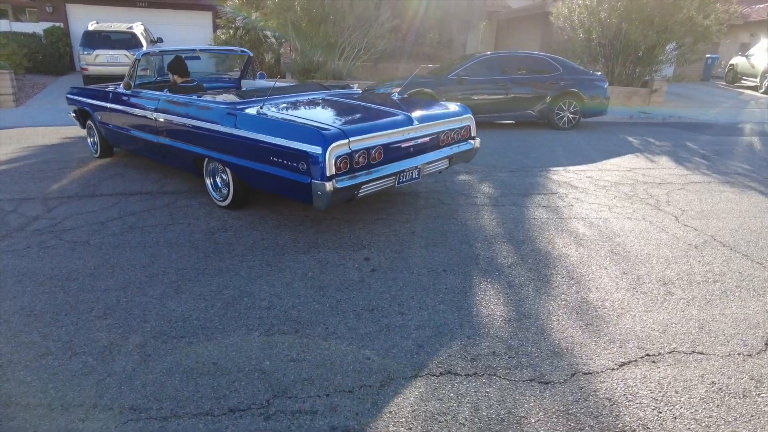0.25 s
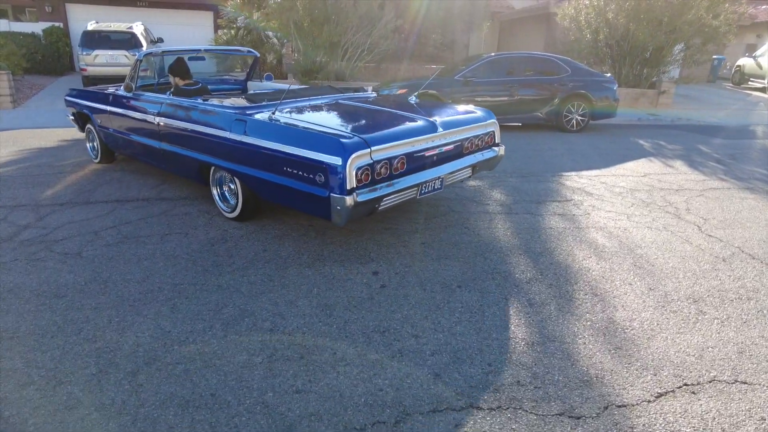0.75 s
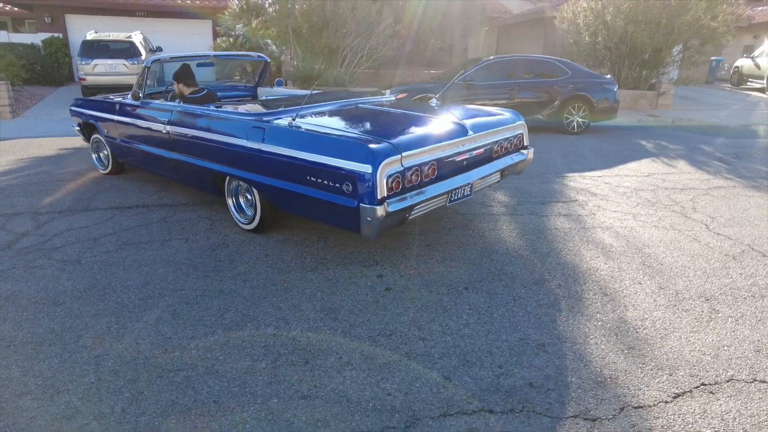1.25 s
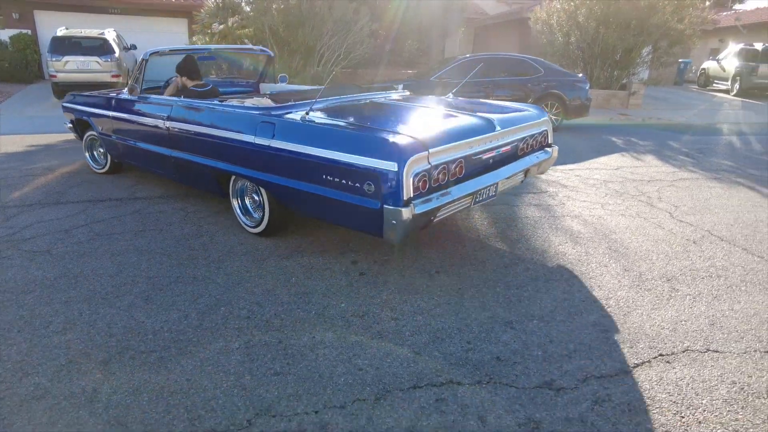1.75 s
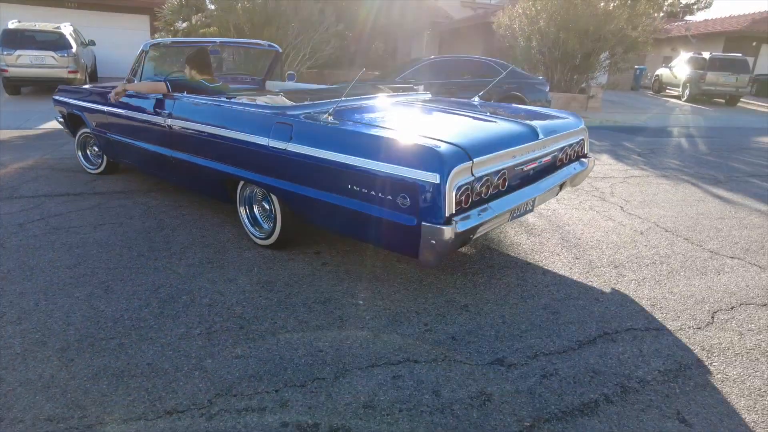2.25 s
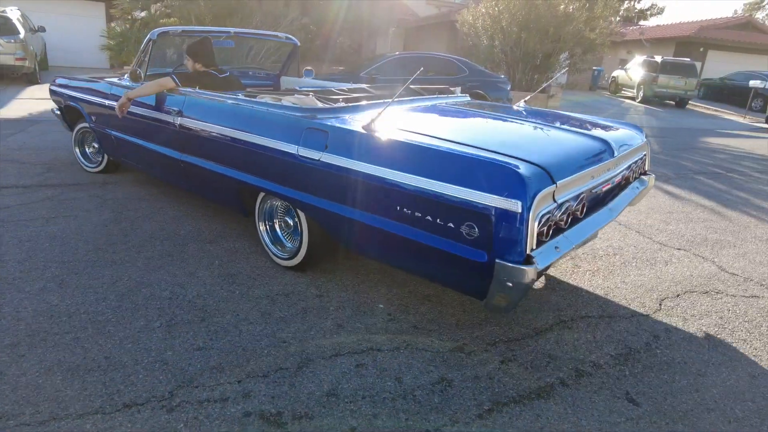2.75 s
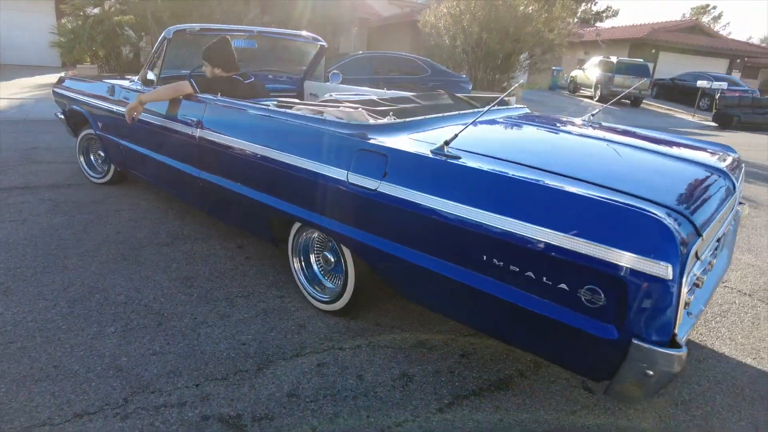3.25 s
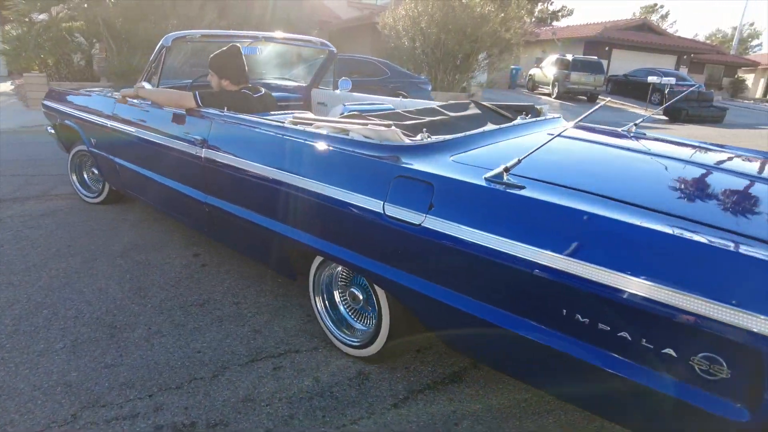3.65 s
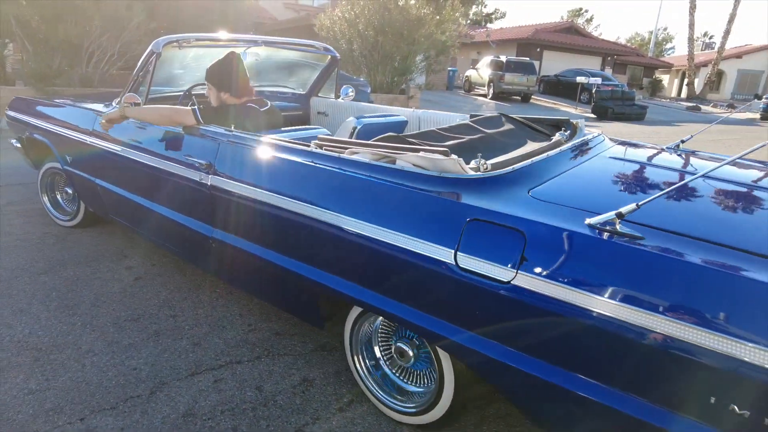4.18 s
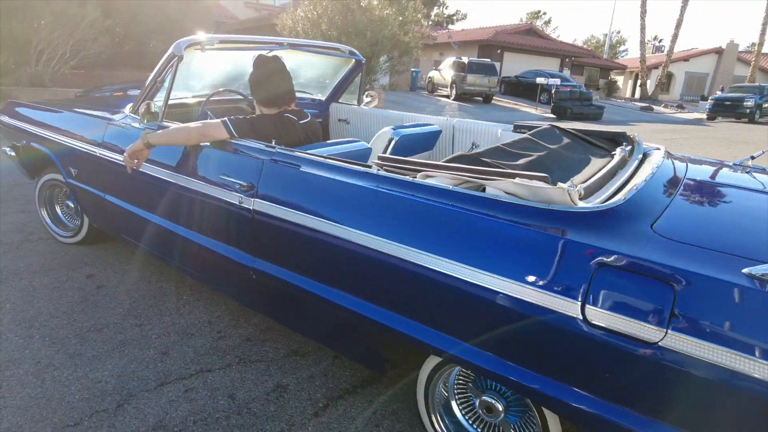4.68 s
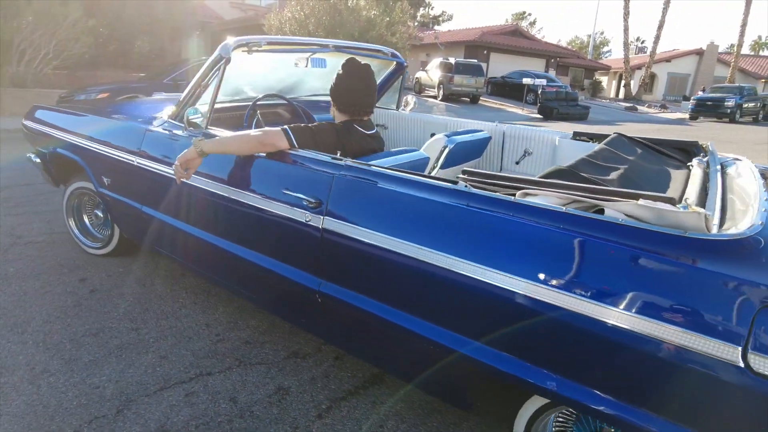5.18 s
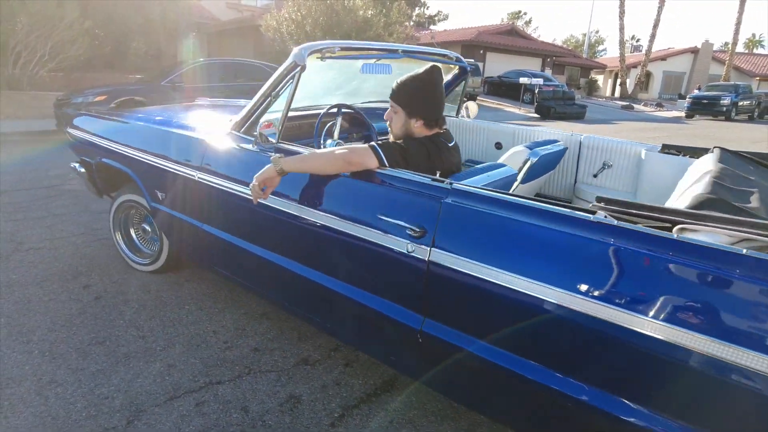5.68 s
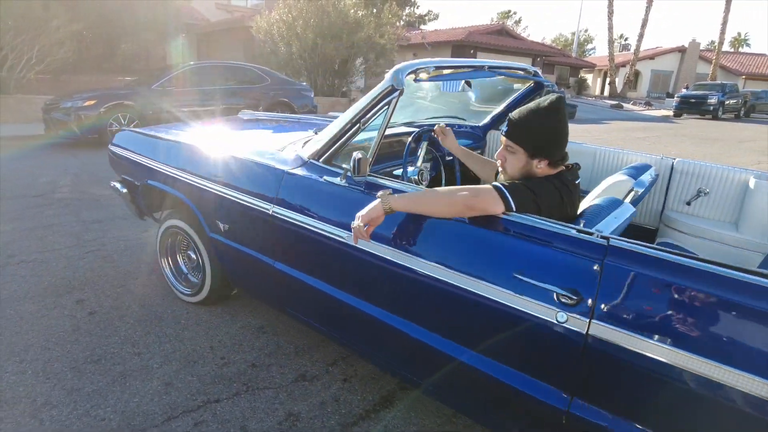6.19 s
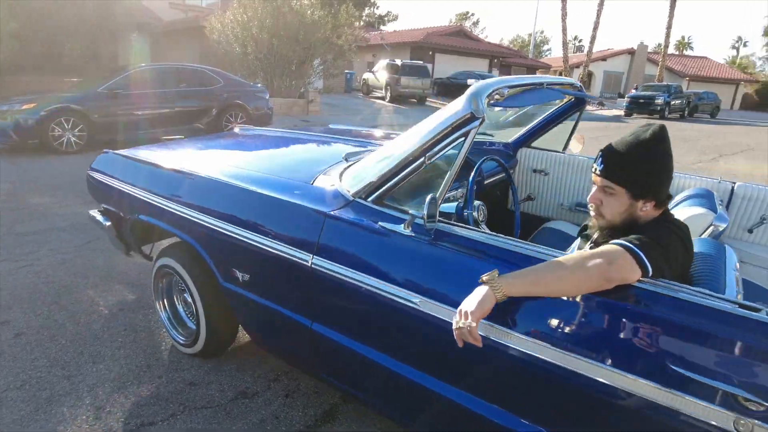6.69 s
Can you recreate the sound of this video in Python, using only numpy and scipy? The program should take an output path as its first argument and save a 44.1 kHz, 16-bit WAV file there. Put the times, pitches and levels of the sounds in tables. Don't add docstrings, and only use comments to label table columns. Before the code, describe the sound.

An old eight-cylinder convertible idles roughly on a residential street, heard in stereo by someone walking past. The exhaust hunts and stumbles, swells in one short soft rev with an airy intake hiss, then drops to a steady lopsided burble. The sound grows nearer, shifting from tail pipe toward bonnet, with more metallic clatter, fan hiss and a faint steering-pump groan. Small stones tick and crunch on the asphalt.

```python
import sys
import numpy as np
from scipy import signal
from scipy.fft import rfft, irfft, next_fast_len
from scipy.io import wavfile
from scipy.ndimage import uniform_filter1d

SR = 44100
rng = np.random.default_rng(int(sys.argv[2]) if len(sys.argv) > 2 else 0)


def how_loud(loudness_db):
    steps = np.asarray(loudness_db, float) / 20
    return 10 ** steps


def persist_wave(psi):
    counts = np.round(np.clip(psi, -1, 1) * 32767).astype(np.int16)
    wavfile.write(sys.argv[1], SR, np.atleast_2d(counts).T)


N = 305613

# t/s, speed/rpm
CRANK_SPEED = [(0.0, 718.9), (0.22, 587.2), (0.7, 615.2), (1.0, 788.9), (1.22, 795.7), (1.46, 944.8),
               (1.67, 957.9), (2.02, 616.2), (2.56, 696.9), (3.53, 691.3), (3.87, 636.0), (4.6, 670.9),
               (5.03, 657.6), (5.48, 698.7), (6.18, 624.8), (6.66, 688.0), (6.77, 677.5), (6.93, 694.3)]
# t/s, load (-1 coasting, 0 idle, 1 throttle pressed)
ENGINE_LOAD = [(0.2, -0.68), (0.3, -1.3), (0.4, 0.17), (0.7, -0.36), (0.92, 0.27), (1.35, 0.55),
               (1.5, 1.04), (1.7, 0.84), (1.8, -0.59), (1.9, 0.17), (2.0, 0.098), (6.9, -0.22)]
# t/s, nearness to tail pipe/dB, nearness to bonnet/dB
WALK_PAST = [
    (0.1, -9.5, -13),
    (0.55, -13.5, -12),
    (0.85, -6.5, -8.5),
    (2.15, -9, -9),
    (2.5, -5.5, -8),
    (3.6, -4, -6),
    (5.6, -2.5, -3),
    (6.05, -8.5, -2),
    (6.6, -6.5, -0.8),
    (6.9, -8.5, -2.5),
]
# t/s, level/dB
MOUTH_FACING = [
    (3.65, 0),
    (3.9, -5),
    (5.2, -9),
    (5.9, -11),
    (6.5, 0),
]
FIRST_FIRING = .42

CYLINDER_UNEVENNESS = [(0.42, 0.023), (0.56, -0.179), (-0.68, -0.127), (0.6, -0.147), (0.47, -0.246),
                       (-1.46, -0.164), (1.71, -0.096), (-1.2, -0.06)]
# t/s, length/s, level/dB
WEAK_CHARGES = [
    (.27, 0.021, -3.5),
    (0.49, 0.015, -2),
    (0.687, 0.013, -18),
]
# f/Hz, width/Hz
SILENCER_MODE = (55.6, 18)
# f/Hz, width/Hz, drive by uneven puffs/dB, drive by common puffs/dB
PIPE_MODES = [(112.1, 14, -24.5, -41), (158.8, 12, -25, -28), (275.6, 16, -19, -15.5),
              (324, 10, -29, -17.5)]
# idle level/dB, rise under load/dB, swing as whole (+) or half (-) firing orders meet it/dB,
# share of nearness to tail, share of nearness to bonnet
PIPE_MODE_LEVELS = [(-34.5, 16, 0.5, 0.4, 0.35), (-49, 10.6, -1.1, 0.79, -1.24),
                    (-49.5, 3.7, -7.5, 0.24, 4), (-41, 12, -3, 0.071, 2.5)]
COMMON_DB, COMMON_NEAR, COMMON_LOAD_DB = -43.5, 0.45, 9.5
UNEVEN_DB, UNEVEN_LOAD_DB = -45.5, -5

PUFF_EDGES = [-7.5, 1.5, -1, -7, -4.5, -11, -20.5, -47]
# f/Hz, width/Hz, level/dB
MOUTH_MODES = [(159.2, 37, 6.5), (216, 77, 1.2), (292, 44, -4)]
BARK_DB, BARK_NEAR, BARK_LAG = -37, 0.98, 0.412

SINGING_ORDERS = [13, 16, 17, 18, 19, 20, 21, 21, 22, 23, 24, 27, 28, 39, 40, 43, 44, 48, 56, 57]
# f/Hz, width/Hz, level/dB, share of nearness to bonnet
ORDER_RESONANCES = [(103, 8, -31, 0), (126, 18, -27, 0), (111, 7, -32, 0), (104, 7, -32, 0),
                    (110.5, 6, -38, 0), (110, 7, -32, 0), (110, 8, -27, 0), (120, 22, -38, -.6),
                    (110, 9, -28, 0), (112, 9, -30, 0), (159, 10, -30, 0), (156, 16, -33, 0),
                    (160, 14, -32, 0), (216, 10, -44, 0), (219, 10, -43, 0), (238, 8, -43, 0),
                    (240, 24, -41, .6), (276, 16, -41, -.2), (323, 9, -46, 1.2), (324, 7, -46, .3)]
PIPE_LAG = 1.1
FADE_IN_S, FADE_IN_DB = 0.3, -10

# t/s, moving throat f/Hz, air flow level/dB
THROTTLE_FLOW = [
    (1.24, 1870, -51),
    (1.266, 2280, -44.5),
    (1.306, 2200, -50.5),
    (1.326, 1940, -39),
    (1.466, 1530, -34.5),
    (1.5, 1550, -35.5),
    (1.57, 2080, -38.5),
    (1.625, 2240, -48),
    (1.85, 1830, -70.5),
]
# f/Hz, level per Hz/dB
AIR_SPECTRUM = [(530, -57), (900, -21), (1140, -39), (1610, -23), (2100, -32), (2540, 1), (2790, -9),
                (4890, -5.5), (5320, -7), (7610, -15.5), (15600, -39.5)]
# f/Hz, width/Hz, level/dB
AIR_BOX_MODES = [(2560, 93, -3.5), (3100, 98, -6), (4260, 63, -0.5), (5170, 160, -3), (5950, 190, 3),
                 (7530, 190, -2)]
FULL_AIR_DB, THROAT_DB, THROAT_SHARE = -31, -23.5, 0.71

# f/Hz, width/Hz, level/dB
PANEL_MODES = [(214.3, 9.7, 0.5), (239.2, 11.2, -3), (262.6, 23.2, -3.5), (368.2, 32.6, -12)]
# f/Hz, width/Hz, level/dB
BRACKET_MODES = [(411.6, 62, 5), (481.4, 53, -2), (526.6, 39, 1.5), (732, 13, -14.5)]
# f/Hz, width/Hz, level/dB
COVER_MODES = [(1291, 33, 9), (1620, 25, -8), (2200, 44, -0.5), (2510, 170, -7), (3420, 56, -18.5)]
# f/Hz, width/Hz, level/dB
SHROUD_MODES = [(2330, 88, -4), (2590, 70, 2), (4230, 64, -1.5), (5200, 72, -16.5), (7740, 210, -7),
                (12500, 300, -16.5)]
# f/Hz, level per Hz/dB
BAY_SPECTRUM = [(350, -45), (600, -0.5), (729, -2.5), (880, -5.5), (990, 0), (1240, -4), (1430, -3.5),
                (1630, -4), (1970, -7.5), (2600, -11.5), (3180, -13), (3840, -16), (4200, -19),
                (5460, -35.5), (9240, -120)]
# f/Hz, level per Hz/dB
FAN_SPECTRUM = [(1760, -7.5), (3000, 1), (3610, -4.5), (4200, -3), (4570, -4), (7000, -9), (7710, -10),
                (9940, -14.5), (12500, -18), (13500, -20), (15600, -20)]
# level/dB, share of nearness to bonnet, rise under load/dB, rise with air/dB
PANEL_GAIN = (-41, 0, 6, -4.5)
BRACKET_GAIN = (-45, 0.63, 4, 7.5)
BAY_GAIN = (-42, 0.75, 4, 7)
FAN_GAIN = (-46, 1.37, 3, 19.5)

# t/s, groan f/Hz, whine f/Hz, effort level/dB
STEERING = [
    (2.5, 749, 1760, -30.5),
    (5.2, 751.6, 1656, -10),
    (5.5, 709, 1720, -2),
    (6.1, 755, 1605, 0.5),
    (6.4, 748, 1574, -2),
    (6.65, 668, 1560, -15),
    (6.9, 576, 1520, -17),
]
# level/dB, width/Hz, share of the effort
GROAN_HOSE = (-49, 36, .05)
WHINE_HOSE = (-52, 90, 1.4)
# level/dB, width/Hz, share of the effort
MOAN_HOSE = (-46, 36.3, 0.061)
MOAN_RATIO = 0.6443
HIDDEN_DB = -5.5

# t/s, ring level/dB, ring f/Hz, snap level/dB, length/ms
RINGING_STONES = [(1.117, -36, 2460, -56, 28), (2.478, -42.5, 2070, -60, 6.3), (2.595, -39, 2770, -64, 1.1),
                  (3.352, -26.5, 1420, -45, 0.83), (3.4315, -37, 7400, -39.5, 1.7),
                  (3.436, -42, 1660, -43.5, 1.2), (3.4515, -53, 12800, -58.5, 0.9),
                  (3.569, -38, 1750, -46, 7.7), (3.586, -41, 1700, -46.5, 4.8),
                  (4.683, -40, 1630, -44.5, 2.3), (.110, -48, 6750, -60, 2.6)]
# t/s, ring level/dB, ring f/Hz, snap level/dB, length/ms
CRUNCHING_GRIT = [(.51, -56, 5000, -64, 25), (.548, -52, 6000, -50, 9), (0.563, -47, 2600, -60, 10),
                  (.568, -53, 7000, -57, 8), (0.594, -41, 2100, -60, 4), (0.6008, -30, 2600, -60, .9),
                  (0.6105, -41, 2500, -62, 3), (2.6492, -36, 3200, -46, 1.5), (2.6501, -29, 3600, -36, .5),
                  (2.6525, -40, 4800, -48, 1.5), (2.6564, -36, 2200, -42, 0.3),
                  (3.4315, -38, 3800, -60, 1.5), (3.4365, -39, 3200, -60, 1.5),
                  (3.352, -45, 5200, -60, 1.5)]
# t/s, ring level/dB, ring f/Hz, snap level/dB, length/ms
CAR_GRIT = [(5.1553, -26.5, 1700, -34, 0.41), (5.1685, -31, 1300, -41, 0.56),
            (5.1745, -30, 1200, -43.5, 0.54), (5.235, -32, 1500, -45, 1.3), (6.1, -40, 5500, -50, 12),
            (6.111, -36, 1900, -45, 2.7), (6.12, -46, 7000, -47.5, 7.1), (6.1584, -21, 2400, -50, 0.35),
            (6.16, -33, 4800, -57, 4.5), (6.1695, -18, 2440, -68, 1.2), (6.1715, -27, 2600, -53, 2.7),
            (6.178, -26, 2000, -48, 0.87), (6.182, -29, 2700, -54, 4.6), (6.189, -35, 2500, -50, 1.5)]
STONE_WIDTH, GRIT_WIDTH = .38, 1.2
CAR_LAG, GROUND_SHARE = 4, .4

# f/Hz, level per Hz/dB
STREET_SPECTRUM = [(22, -6), (35, -9.5), (90, -8), (140, -15), (190, -28.5), (400, -41), (900, -36.5)]
STREET_DB = -30
# f/Hz, left-right likeness
PORT_LIKENESS = [(60, 0.98), (250, 0.92), (640, 0.78), (1400, 0.81), (3000, 0.31), (4500, 0.21),
                 (7000, 0.12), (14000, 0.14)]
# f/Hz, left minus right level/dB
PORT_TILT = [(50, 0), (110, -0.5), (200, 2.5), (380, 0.5), (700, 1), (1290, 0.5), (2380, 0.0), (4400, 1.5),
             (8120, 1.5), (15000, 3)]
# f/Hz, left lead/rad
PORT_LEAD = [(30, 0.065), (60, 0.08), (125, 0.2), (250, 0.3), (500, 0.69), (1000, 1.99), (1400, 0.44),
             (2100, 1.04), (4500, 3.06), (7000, 4.1), (11000, 4.4), (15000, 5.3)]


def evened(x):
    return x / np.sqrt(np.mean(x ** 2) + 1e-20)


def smooth(x, size):
    return uniform_filter1d(x, size=size, axis=-1)


def wander(size):
    return evened(smooth(rng.standard_normal(N), size))


def read(points, hz):
    f, value = np.transpose(points)
    return np.interp(np.log(hz + 1), np.log(f + 1), value)


def curves(rows):
    s, *columns = np.transpose(rows)
    return [np.interp(np.arange(N) / SR, s, c) for c in columns]


def ring(x, hz, width):
    b, a = signal.iirpeak(hz, hz / width, SR)
    return signal.lfilter(b, a, signal.lfilter(b, a, x))


def modes(x, table):
    return evened(sum(how_loud(db) * ring(x, hz, width) for hz, width, db in table))


def glide(x, hz, width):
    turn = np.exp(2j * np.pi * np.cumsum(hz) / SR)
    r = np.exp(-np.pi * width / SR)
    b, a = [1 - r], [1, -r]
    return evened((turn * signal.lfilter(b, a, signal.lfilter(b, a, x / turn))).real)


def noise(spectrum, patchy_db):
    frames = (N // 128 + 5) // 4
    hz = np.fft.rfftfreq(2048, 1 / SR)
    colour = how_loud(read(spectrum, hz)) * (hz > spectrum[0][0]) * (hz < spectrum[-1][0])
    patches = uniform_filter1d(rng.standard_normal((frames, 1025)), size=16, axis=1)
    patches = evened(uniform_filter1d(patches, size=5, axis=0))
    z = rng.standard_normal((2, frames, 1025, 2)) @ [1, 1j]
    z = z * colour * how_loud(patchy_db * patches)
    return evened(signal.istft(z.transpose(0, 2, 1), nperseg=2048, noverlap=1536)[1][:, :N])


def pair(x, y, near=0):
    size = next_fast_len(N + 8192)
    hz = np.fft.rfftfreq(size, 1 / SR)
    padding = (4096, size - N - 4096)
    x, y = (rfft(np.pad(v, padding, "reflect", reflect_type="odd")) for v in (x, y))
    same = np.clip(read(PORT_LIKENESS, hz), 0, 1) ** (1 - near)
    right = same * x * np.exp(-1j * read(PORT_LEAD, hz)) + np.sqrt(1 - same ** 2) * y
    tilt = how_loud(read(PORT_TILT, hz) / 2)
    return irfft(np.array([x * tilt, right / tilt]), size)[:, 4096:N + 4096]


def firings():
    return FIRST_FIRING + np.cumsum(curves(CRANK_SPEED)[0] / 15) / SR


def exhaust(scatter=.06, wobble=.02, swirl=.22):
    turned = firings()
    count = np.arange(1, int(turned[-1]))
    extra, lag = np.transpose(CYLINDER_UNEVENNESS)[:, count % 8]
    (effort,), (tail_db, bonnet_db) = curves(ENGINE_LOAD), curves(WALK_PAST)
    common_db = COMMON_DB + COMMON_NEAR * tail_db + COMMON_LOAD_DB * effort
    uneven_db = UNEVEN_DB + tail_db + UNEVEN_LOAD_DB * abs(effort)
    rate = curves(CRANK_SPEED)[0] / 15

    even, uneven = np.zeros((2, N))
    chance = rng.standard_normal((len(count), 2))
    even[np.searchsorted(turned, count)] = 1 + wobble * chance[:, 0]
    uneven[np.searchsorted(turned, count + lag)] = extra + scatter * chance[:, 1]
    puff, swell = np.hanning(401), np.hanning(901)
    puffs = signal.oaconvolve(even * how_loud(common_db), swell / swell.sum(), "same")
    puffs += signal.oaconvolve(uneven * how_loud(uneven_db), puff / puff.sum(), "same")

    lead_in = how_loud(8.5) * puffs[:7300]
    out = how_loud(1.5) * SR * ring(np.r_[lead_in, puffs], *SILENCER_MODE)[7300:]
    t = np.arange(N) / SR
    out *= how_loud(sum(db * np.exp(-((t - s) / length) ** 2) for s, length, db in WEAK_CHARGES))

    common_lead = how_loud(common_db - uneven_db)
    gas = how_loud(-19.0) * swirl * rng.standard_normal(N)
    for mode, levels in zip(PIPE_MODES, PIPE_MODE_LEVELS):
        hz, width, uneven_share_db, even_share_db = mode
        idle_db, load_db, swing_db, tail, bonnet = levels
        mode_db = idle_db + load_db * np.maximum(effort, 0) + swing_db * np.cos(2 * np.pi * hz / rate)
        mode_db += tail * tail_db + bonnet * bonnet_db
        mode_db += curves(MOUTH_FACING)[0] * (150 < hz < 170) / 2
        drive = how_loud(uneven_share_db) * evened(uneven) + how_loud(even_share_db) * common_lead * evened(even)
        tone = ring(drive + gas, hz, width)
        out += how_loud(mode_db) * tone / np.sqrt(smooth(tone ** 2, SR // 3) + 1e-12)
    return pair(out, out)


def bark(scatter_db=2.0, jitter=.03):
    turned = firings()
    count = np.arange(1, int(turned[-1]) - 1)
    chance = rng.standard_normal((len(count), 2))
    at = np.searchsorted(turned, count + BARK_LAG + jitter * chance[:, 0])
    edges = np.zeros(N)
    edges[at] = how_loud(np.array(PUFF_EDGES)[count % 8] + scatter_db * chance[:, 1])
    out = how_loud(BARK_DB + BARK_NEAR * curves(WALK_PAST)[0]) * modes(edges, MOUTH_MODES)
    return pair(out, out)


def drone(level_db=-0.6, waver_db=1.2):
    cycle = 2 * np.pi * firings() / 8
    rate = curves(CRANK_SPEED)[0] / 120
    tail_db, bonnet_db = curves(WALK_PAST)
    out, (facing_db,) = np.zeros(N), curves(MOUTH_FACING)
    fade_in_db = FADE_IN_DB * np.clip(1 - np.arange(N) / SR / FADE_IN_S, 0, 1)
    wavers = evened(smooth(rng.standard_normal((len(SINGING_ORDERS), N // 100 + 1)), 50))
    for order, (hz, width, db, share), waver in zip(SINGING_ORDERS, ORDER_RESONANCES, wavers):
        waver = waver_db * np.interp(np.arange(N) / 100, np.arange(len(waver)), waver)
        meet = 1 / (1 + (2 * (order * rate - hz) / width) ** 2)
        shade_db = fade_in_db * (hz > 130) + facing_db * (150 < hz < 170)
        gain = how_loud(level_db + shade_db + db + tail_db + share * bonnet_db + waver)
        out += gain * meet * np.sqrt(2) * np.cos(order * cycle - PIPE_LAG)
    return pair(out, out)


def intake(width=480, whistle_db=-12.5, horns_db=-8):
    hz, air_db = curves(THROTTLE_FLOW)
    throat_db = THROAT_DB + THROAT_SHARE * (air_db - FULL_AIR_DB)
    gate = np.interp(np.arange(N) / SR, [1.22, 1.27, 1.62, 1.93], [0, 1, 1, 0])
    flutter = how_loud(wander(500))
    white = rng.standard_normal((2, N))
    throat = glide(white, hz * (1 + .035 * wander(900)), width)

    gusts = evened(smooth(rng.standard_normal((len(AIR_BOX_MODES), N // 100 + 1)), 8))
    gusts = how_loud(5.0 * smooth(np.repeat(gusts, 100, axis=1), 300))
    n = 2 * SR
    drifts = 1 + .025 * evened(smooth(rng.standard_normal((len(AIR_BOX_MODES), n)), 2500))
    horns = np.zeros((2, n))
    for (f, w, db), gust, drift in zip(AIR_BOX_MODES, gusts, drifts):
        horns += how_loud(db) * gust[:n] * glide(white[:, :n], f * drift, 1.4 * w)
    horns = np.pad(evened(horns), ((0, 0), (0, N - n)))

    grain = how_loud(1.2 * wander(120))
    air = evened(grain * noise(AIR_SPECTRUM, 2.2)) + how_loud(horns_db) * horns
    whistle = how_loud(throat_db + whistle_db) * flutter ** 2 * throat
    return pair(*(gate * flutter * (how_loud(air_db) * air + whistle)), near=.5)


def bay_gain(setting):
    db, share, load_db, air_db = setting
    effort = np.maximum(curves(ENGINE_LOAD)[0], 0)
    air = how_loud(curves(THROTTLE_FLOW)[1] - FULL_AIR_DB)
    return how_loud(db + share * curves(WALK_PAST)[1] + load_db * effort + air_db * air)


def panels(shake):
    return bay_gain(PANEL_GAIN) * modes(shake, PANEL_MODES) + bay_gain(BRACKET_GAIN) * modes(shake, BRACKET_MODES)


def bay_rattle(shake, throb=0.024):
    pulse = 1 + throb * np.cos(2 * np.pi * firings())
    return bay_gain(BAY_GAIN) * pulse * (noise(BAY_SPECTRUM, 1.85) + how_loud(-12.0) * modes(shake, COVER_MODES))


def fan_hiss(shake):
    flicker = how_loud(1.18 * wander(2500))
    shroud = how_loud(-13.0) * flicker ** 2.2 * modes(shake, SHROUD_MODES)
    return bay_gain(FAN_GAIN) * flicker * (noise(FAN_SPECTRUM, 0.73) + shroud)


def clatter(lope=0.12):
    shake = rng.standard_normal((2, N)) * (1 + lope * np.cos(2 * np.pi * firings() / 8 + 3.5))
    return pair(*(panels(shake) + bay_rattle(shake) + fan_hiss(shake)))


def pump():
    groan_hz, whine_hz, effort_db = curves(STEERING)
    shade_db = 0.89 * np.minimum(curves(WALK_PAST)[1] - HIDDEN_DB, 0)
    oil = rng.standard_normal((2, N))
    out = np.zeros((2, N))
    hoses = (MOAN_RATIO * groan_hz, MOAN_HOSE), (groan_hz, GROAN_HOSE), (whine_hz, WHINE_HOSE)
    for hz, (db, width, share) in hoses:
        out += how_loud(db + share * effort_db + shade_db) * glide(oil, hz, width)
    return pair(*out)


def grit():
    out, t = np.zeros((2, N + 3000)), np.arange(3000) / SR
    kinds = ((RINGING_STONES, STONE_WIDTH, CAR_LAG), (CRUNCHING_GRIT, GRIT_WIDTH, 0), (CAR_GRIT, GRIT_WIDTH, CAR_LAG))
    for table, share, lag in kinds:
        for s, ring_db, hz, snap_db, ms in table:
            burst = rng.standard_normal((2, 3000)) * (np.exp(-1000 * t / ms) + .07 * np.exp(-t / .01))
            burst *= 1 - np.exp(-(4000 * t / ms) ** 2)
            burst[0, 6:11] -= np.hanning(7)[1:-1] * min(2.5, 2 / ms ** 2)
            burst[1] = np.roll(burst[0], lag) + GROUND_SHARE * burst[1]
            low = ring(ring(burst, hz, share * hz), hz, share * hz)
            high = ring(burst, 5500, 12000)
            tick = how_loud(ring_db) * low / abs(low[0]).max() + how_loud(snap_db) * high / abs(high[0]).max()
            out[:, round(s * SR):][:, :3000] += tick
    return out[:, :N]


def street():
    return pair(*(how_loud(STREET_DB) * noise(STREET_SPECTRUM, 0.94)))


def scene():
    return exhaust() + bark() + drone() + intake() + clatter() + pump() + grit() + street()


def low_pass(x):
    return signal.sosfilt(signal.butter(12, 15710, fs=SR, output="sos"), x)


def record(dry):
    return low_pass(dry)


dry = scene()
out = record(dry)
persist_wave(out)
```